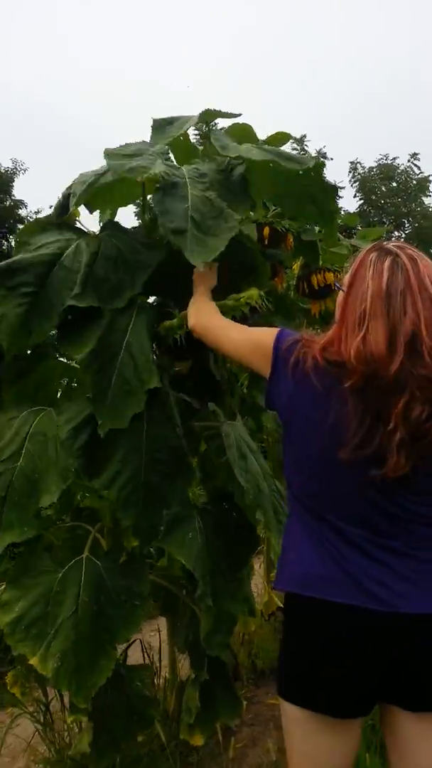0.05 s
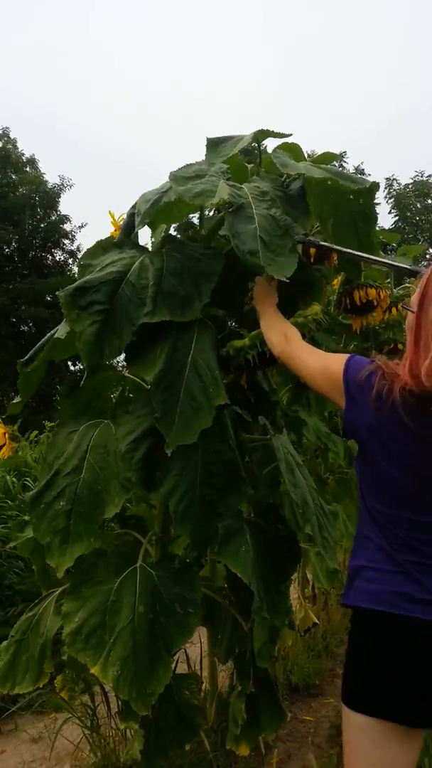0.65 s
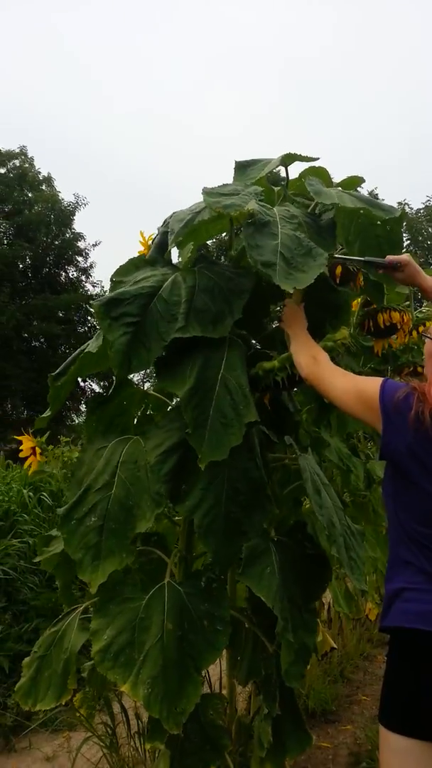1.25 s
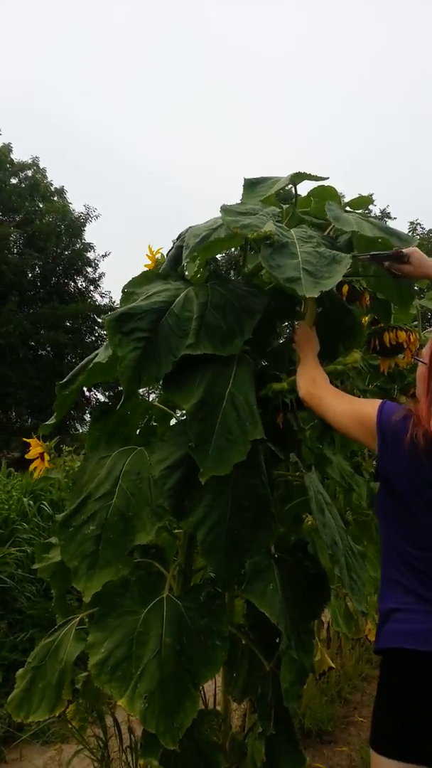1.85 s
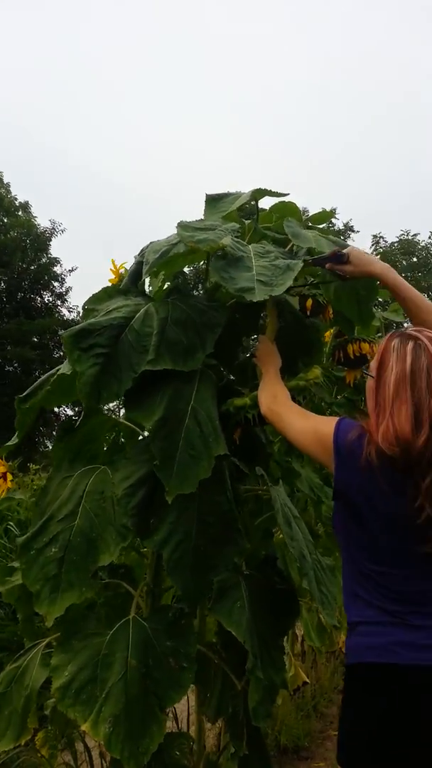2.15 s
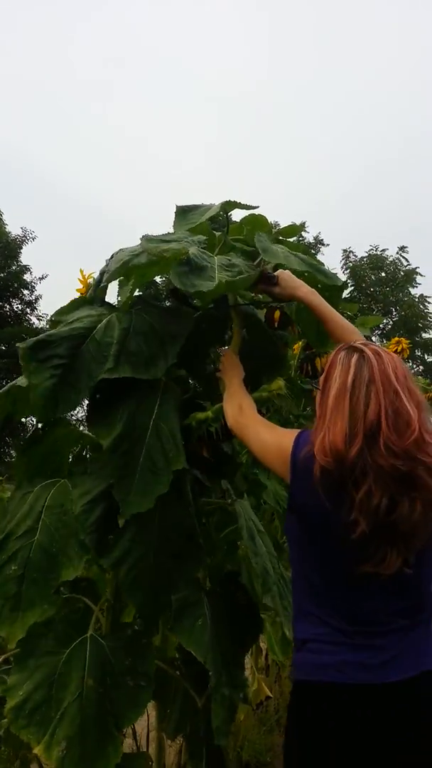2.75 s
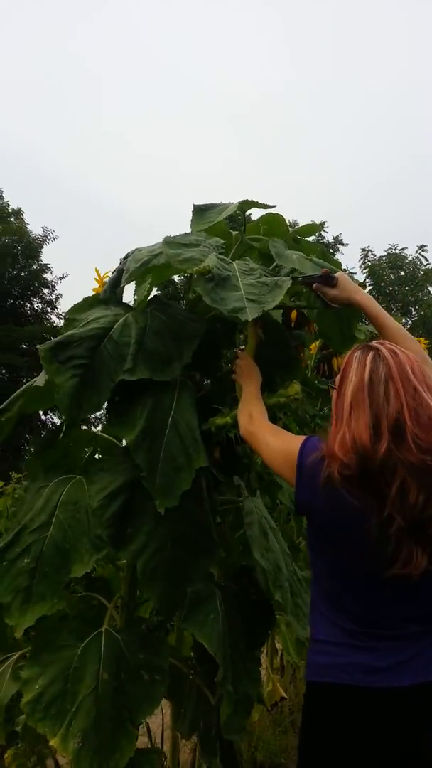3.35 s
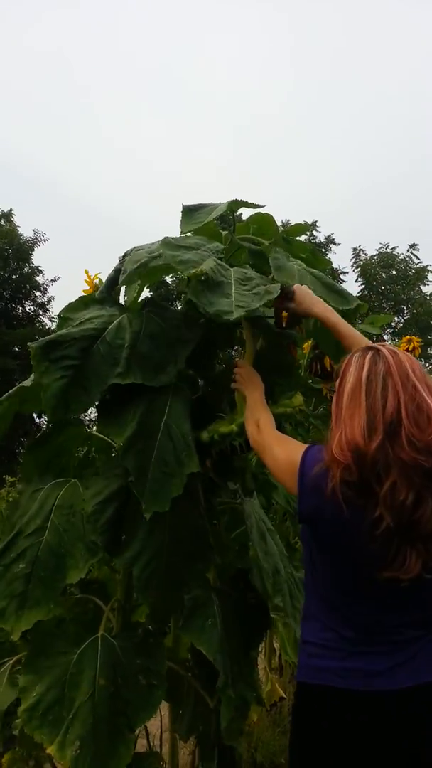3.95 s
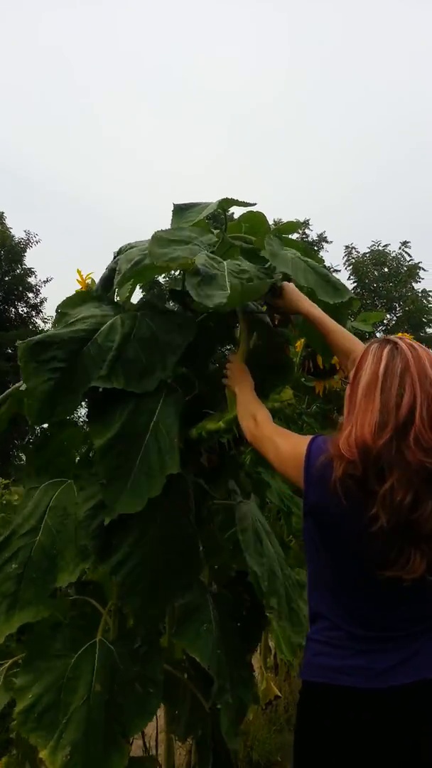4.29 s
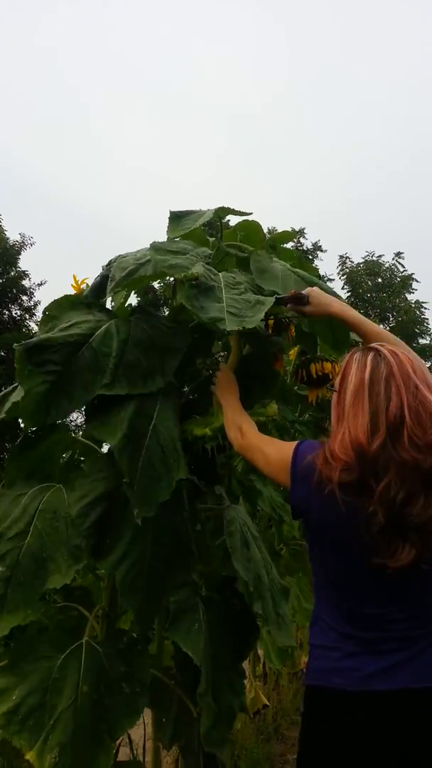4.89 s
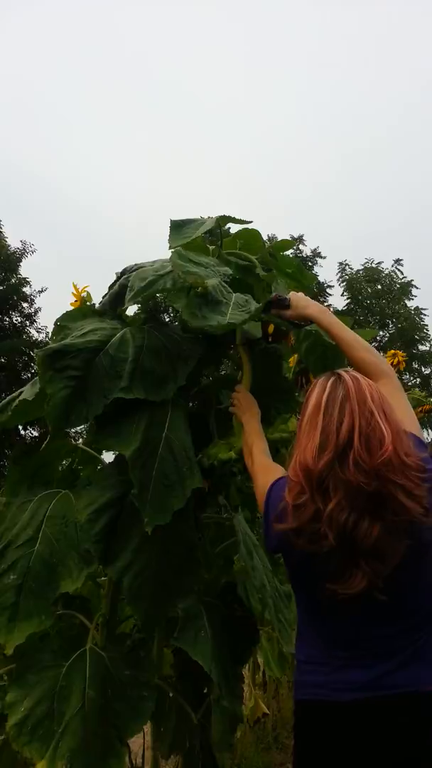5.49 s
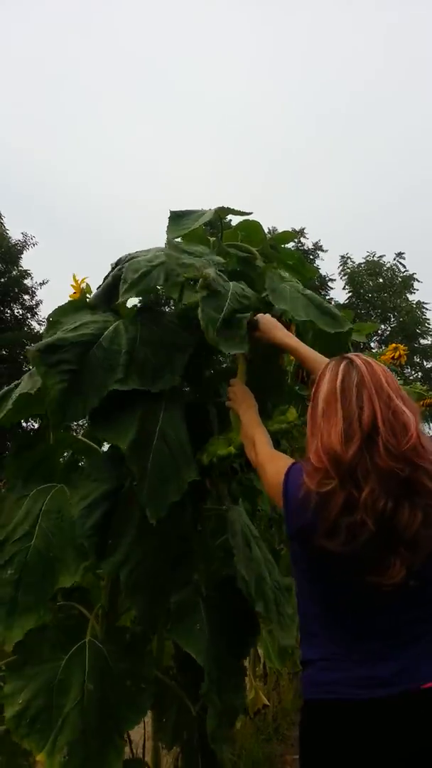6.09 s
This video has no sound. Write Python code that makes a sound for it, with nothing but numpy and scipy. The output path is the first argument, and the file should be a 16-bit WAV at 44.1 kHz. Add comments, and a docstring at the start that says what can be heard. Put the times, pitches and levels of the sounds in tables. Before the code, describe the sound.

Big leaves rustle and a sunflower stalk cracks as its seed head is worked loose, while cicadas pulse and crickets chirp.

```python
"""A summer garden: someone works a seed head off a tall sunflower. Big rough leaves scrape over each
other and flap puffs of air; the stalk's fibres crack and tear, ringing the stalk. Cicadas buckle their
tymbals in the trees, swelling about once a second. Crickets chirp and a katydid rattles with wing
strokes, over far insects and open air. Twice the right microphone pops."""
import sys
import numpy as np
from scipy import signal
from scipy.fft import rfft, irfft, next_fast_len
from scipy.io import wavfile
from scipy.ndimage import uniform_filter1d, map_coordinates

SR = 44100
rng = np.random.default_rng(int(sys.argv[2]) if len(sys.argv) > 2 else 0)


def pcm_store(signal):
    """Save signal as 16-bit PCM."""
    levels = np.round(np.clip(np.atleast_2d(signal), -1, 1) * 32767)
    wavfile.write(sys.argv[1], SR, levels.astype(np.int16).T)


N = 274743

# Leaf-on-leaf strokes: start_s, length_s, relative_db, release_s
LEAF_STROKES = [(0, 0.2, -55.5, 0.21), (0.431, 0.014, -58, 0.027), (0.782, 0.067, -50.5, 0.02),
                (1.064, 0.03, -63.5, 0.054), (1.275, 0.094, -62, .05), (2.301, .02, -54, 0.088),
                (2.504, 0.056, -46, 0.064), (2.677, 0.024, -54.5, .02), (2.773, 0.025, -60, 0.066),
                (2.892, 0.11, -51.5, .14), (2.996, 0.013, -45, 0.012), (3.352, 0.2, -58.5, 0.084),
                (3.656, .03, -58.5, 0.025), (3.785, 0.097, -52, 0.061), (3.988, 0.067, -46.5, 0.053),
                (4.142, 0.036, -44.5, 0.065), (4.318, 0.016, -46.5, .04), (4.391, 0.065, -50, 0.043),
                (4.629, 0.04, -47, 0.11), (4.773, 0.096, -49.5, .14), (5.056, 0.18, -57.5, 0.12),
                (5.239, 0.027, -51.5, 0.017), (5.418, 0.11, -56, .015), (5.618, 0.15, -60, .025),
                (5.945, 0.018, -44.5, 0.036), (6.018, 0.012, -36.5, 0.011), (6.077, 0.015, -44, .11)]
# Rubbing spectrum: freq_hz, gain_db
RUB_SPECTRUM = [(100, -15.5), (250, -8.5), (500, -11), (1200, -6.5), (2000, -4.5), (2700, -2), (3500, -3.5),
                (5000, 2), (6000, 3), (7000, 0), (9000, -7.5), (11500, -12.5), (14500, -21.5)]


def leaf_rubbing(attack_s=0.032):
    """Bristles catch and slip in uneven spurts, leaf edges crinkle, broad surfaces hiss."""
    bristles = sum(foliage(ticks(rate_hz=500, spread_db=2.0), scatter=0.81, t60_s=0.031)
                   for _ in range(5))
    crinkles = foliage(ticks(rate_hz=70, spread_db=2.5), scatter=0.99, t60_s=0.011)
    sliding = rng.standard_normal((2, N))
    rubbing = colour(unit(bristles) + 0.38 * unit(crinkles) + 0.53 * sliding, RUB_SPECTRUM)
    stroke_power = sum((undb(db) * envelope(start_s, length_s, attack_s, release_s)) ** 2
                       for start_s, length_s, db, release_s in LEAF_STROKES)
    contact = undb(-67.5) * dip(depth_db=-8)  # the leaves never quite stop touching
    grip = np.sqrt(stroke_power + contact ** 2)
    return dapple(rubbing, spread_db=4.5, rate_hz=25) * grip * undb(1.35 * walk(rate_hz=70) + 7.0)


# Fibre breaks: start_s, relative_db, brightest_hz, left_minus_right_db
FIBRE_BREAKS = [(0.6802, -44.5, 895, 3), (2.979, -33, 6800, -9), (3.002, -26.5, 6700, 6),
                (4.071, -26.5, 7000, 4), (4.1959, -14.5, 3400, 1.5), (5.231, -22.5, 5300, 6.5),
                (5.4687, -29, 7800, 7.5), (5.5, -22, 6400, 2.5), (5.6112, -37.5, 6000, 5),
                (5.6607, -17.5, 6200, 2), (5.7203, -38, 5000, 5), (5.75, -27.5, 4860, 6),
                (5.883, -25, 6700, -1), (5.99, -31, 7000, 1), (5.997, -15.5, 4430, 2),
                (6.002, -17.5, 2800, -2), (6.0168, -23, 7000, -8), (6.022, -15, 4480, 1.5),
                (6.032, -24, 6700, -11)]
# Fracture spectrum: freq_hz, gain_db
FRACTURE_SPECTRUM = [(100, -37), (300, -13), (700, -5.5), (1400, -15.5), (2500, -7), (3600, 0.5),
                     (4800, 4.5), (5900, -0.5), (7000, 5.5), (9500, -5), (14500, -8.5)]
# Stalk resonances: pitch_hz, t60_s, relative_db
STALK_MODES = [(2516, 0.021, -2.5), (3374, 0.018, -3.5), (4577, 0.045, -4), (5250, 0.038, -1.5),
               (6740, 0.018, 1)]


def stalk_cracks():
    """Each fibre lets go in a run of fractures; the pithy stalk rings and leaves scatter the snap."""
    out = np.zeros((2, N))
    t = np.arange(SR // 10) / SR
    for start_s, db, bright_hz, pan_db in FIBRE_BREAKS:
        fractures = rng.standard_normal((2, len(t))) * np.exp(-t / 0.0013)
        tail = rng.standard_normal((2, len(t))) * decay(t, t60_s=0.035)
        ring = np.zeros(len(t))
        for mode_hz, t60_s, mode_db in STALK_MODES:
            detune = 1 + 0.0167 * rng.standard_normal()  # each break strikes another spot
            ring += undb(mode_db) * decay(t, t60_s) * np.sin(2 * np.pi * mode_hz * detune * t)
        burst = colour(unit(fractures) + 1.1 * unit(tail), FRACTURE_SPECTRUM)
        brightness = [(bright_hz / 3, -7), (bright_hz, 0), (bright_hz * 2, -3), (bright_hz * 6, -14)]
        snap = colour(unit(burst) + 0.5 * unit(ring), brightness)
        peak_rms = np.sqrt(uniform_filter1d(np.mean(snap ** 2, axis=0), SR // 500).max())
        add(out, start_s, snap / peak_rms * undb([[db + pan_db / 2], [db - pan_db / 2]]))
    return out * undb(-4.5)


# Leaf swings: peak_s, relative_db, half_length_s, crumple_offset_db
LEAF_SWINGS = [(2.316, -57, 0.021, -23), (2.473, -50, 0.048, -4.5), (2.57, -47, 0.055, -9),
               (3.51, -58.5, 0.023, -24), (3.789, -50, 0.039, -3), (4.028, -49.5, 0.081, -3.5),
               (4.164, -51, 0.053, -2.5), (4.203, -40, 0.015, -6.5), (4.316, -57, 0.025, 7),
               (4.788, -52, 0.055, -4), (5.955, -55.5, 0.08, -6.5), (6, -44, 0.017, 1.5),
               (6.027, -38, 0.019, 2), (6.079, -47, 0.048, 0), (6.153, -51, 0.075, -10)]
# Air puff spectrum: freq_hz, gain_db
PUFF_SPECTRUM = [(60, -35.5), (140, -4), (220, -0.5), (300, -2), (420, -25.5), (900, -19), (4000, -52)]
# Bending blade spectrum: freq_hz, gain_db
CRUMPLE_SPECTRUM = [(150, -14), (350, -12.5), (480, 2), (620, -5), (850, -2.5), (1300, -13), (4000, -19.5)]


def leaf_flaps():
    """A broad leaf swings and pushes a soft puff of air; its blade crumples as it bends."""
    force = np.zeros((2, N))
    for peak_s, db, half_length_s, crumple_db in LEAF_SWINGS:
        swing = np.hanning(int(2 * half_length_s * SR))
        add(force, peak_s - half_length_s, undb([[db], [db + crumple_db]]) * swing)
    push, bend = force
    puff = colour(foliage(rng.standard_normal(N), scatter=0.31, t60_s=0.041), PUFF_SPECTRUM)
    creases = foliage(ticks(rate_hz=1100, spread_db=3.5), scatter=0.41, t60_s=0.0076)
    crumple = colour(creases, CRUMPLE_SPECTRUM)
    return unit(puff) * push * undb(1.0) + unit(crumple) * bend * undb(3.5)


def leaf_thud(start_s=0.979, contact_s=0.0023, peak_db=-41.5):
    """A leaf blade pulls taut: one soft push rings it for a few cycles."""
    push = np.zeros((1, N))
    add(push, start_s, np.hanning(int(contact_s * SR))[None])
    blade = colour(push, [(60, -27), (150, -8), (235, 3.5), (320, -4.0), (450, -30), (1500, -39)])
    return blade / np.abs(blade).max() * undb(peak_db)


# Chorus swells: peak_s, relative_db, rise_s, fall_s
CICADA_SWELLS = [(.1, -42.5, .3, 0.19), (1.29, -42.5, 0.34, 0.19), (1.66, -54, 0.11, .06),
                 (2.59, -41, 0.37, 0.12), (3.15, -52.5, 0.22, 0.19), (3.71, -42.5, 0.31, 0.22),
                 (4.93, -42.5, 0.39, 0.29), (6.12, -41.5, .24, .3)]
# Cicada body spectrum: freq_hz, gain_db
TYMBAL_SPECTRUM = [(2500, -33.5), (3400, -25.5), (4100, -9), (4800, -8), (5400, -4.5), (6400, 1.5),
                   (7200, -4), (8200, -10.5), (9500, -23.5), (11000, -31), (14500, -35)]


def cicadas():
    """Many tymbals buckle out of step and ring their bodies; the sizzle swells over a quiet lull."""
    t = np.arange(N) / SR
    clicks = np.array([ticks(rate_hz=5000, spread_db=2.0) for _ in range(2)])
    sizzle = dapple(colour(clicks, TYMBAL_SPECTRUM), spread_db=3.0, rate_hz=16)
    power = undb(-65.5) ** 2  # lull
    for peak_s, db, rise_s, fall_s in CICADA_SWELLS:
        width_s = np.where(t < peak_s, rise_s, fall_s)
        swell = undb(db) * np.exp(-((t - peak_s) / width_s) ** 2)
        power += swell ** 2
    return sizzle * np.sqrt(power) * dip(depth_db=-9.5) * undb(1.23 * walk(rate_hz=40) + 1.0)


def chirp(pitch_hz, stroke_s, fall, arch, strokes=7):
    """A few wing strokes; the pitch falls in each as the scraper slows, and arches over the chirp."""
    stroke = np.arange(int(strokes * stroke_s * SR)) / (stroke_s * SR)
    within = stroke % 1
    swell = np.sin(np.pi * stroke / strokes)
    teeth = 0.071 * rng.standard_normal(len(stroke))
    detune = 0.005 * rng.standard_normal()
    hz = pitch_hz * (1 - fall * (within - 0.5) + arch * (swell - 1) + teeth + detune)
    tone = np.sin(2 * np.pi * np.cumsum(hz) / SR)
    return unit(tone * np.sin(np.pi * within) ** 2 * np.sqrt(swell))[None]


# Near cricket's chirp runs: start_s, end_s, period_s
CHIRP_RUNS = [(.335, .6, .196), (.755, 1.4, .188), (1.49, 3.8, .183), (3.945, 6.1, .25)]


def crickets(near_db=-54.5, far_db=-62.0, lead_s=0.028):
    """A near ground cricket scrapes its wings; a fainter, higher one keeps its own pace."""
    near, far = np.zeros((2, 1, N))
    for start_s, end_s, period_s in CHIRP_RUNS:
        for beat_s in np.arange(start_s, end_s, period_s):
            call = chirp(pitch_hz=9350, stroke_s=0.0085, fall=0.13, arch=0.0466)
            add(near, beat_s - lead_s, undb(near_db) * call)
    for beat_s in np.arange(0, N / SR, 0.199):
        jitter_s = 0.013 * rng.standard_normal()
        call = chirp(pitch_hz=9880, stroke_s=0.0089, fall=0.018, arch=0.014)
        add(far, beat_s + jitter_s, undb(far_db) * call)
    return foliage(near[0], scatter=0.69, t60_s=0.034) + foliage(far[0], scatter=2.9, t60_s=0.036)


# Wing rattle: time_s, stroke_rate_hz, relative_db
KATYDID_RATTLE = [(0, 35.7, -52.5), (.6, 42, -57), (1.2, 33, -54), (1.25, 38, -61), (1.7, 33.3, -75),
                  (2.2, 31, -63), (6.23, 23, -80)]


def katydid():
    """Every wing stroke rasps a puff of very high noise."""
    t = np.arange(N) / SR
    time_s, stroke_rate_hz, db = np.transpose(KATYDID_RATTLE)
    phase = np.cumsum(np.interp(t, time_s, stroke_rate_hz)) / SR
    strokes = unit(np.sin(np.pi * phase) ** 4 + 0.72)
    wing_spectrum = [(9000, -34), (11000, -10), (11900, 1), (12400, -8), (13000, 8), (14500, -3.5)]
    rasp = colour(rng.standard_normal((2, N)), wing_spectrum)
    return dapple(rasp, spread_db=2.0, rate_hz=30) * strokes * undb(np.interp(t, time_s, db) - 0.5)


# Right microphone steps: start_s, step_db
MIC_STEPS = [(3.3729, -13), (3.7404, 1.5)]


def microphone_pops(bass_cut_hz=56, damping=1.66):
    """A sudden step in the right microphone's signal; two bass cuts make it swing back and settle."""
    step = np.zeros(N)
    for start_s, step_db in MIC_STEPS:
        step[int(start_s * SR):] += undb(step_db)
    omega = 2 * np.pi * bass_cut_hz
    b, a = signal.bilinear([1, 0, 0], [1, damping * omega, omega ** 2], SR)
    right = signal.lfilter(b, a, signal.lfilter(b, a, step))
    return np.array([np.zeros(N), right])


# Far insect and air spectrum: freq_hz, gain_db
GARDEN_SPECTRUM = [(30, -19), (60, -4), (130, -8), (230, -7), (400, -16), (700, -22.5), (1500, -26.5),
                   (3200, -18.5), (4800, -15), (6000, -23), (7400, -8), (9500, -7), (11200, -15.5),
                   (14500, -9.5)]


def garden(level_db=-54.0):
    """Countless far insects over a faint rumble of open air."""
    noise = rng.standard_normal((2, N)) + 0.5 * rng.standard_normal(N)
    chorus = dapple(colour(noise, GARDEN_SPECTRUM), spread_db=4.5, rate_hz=28)
    return chorus * dip(depth_db=-5) * undb(level_db + walk(rate_hz=16))


def foliage(x, scatter, t60_s, left_lag_samples=3):
    """Direct sound reaches the right microphone first; leaves scatter a short tail to each side."""
    t = np.arange(SR // 20) / SR
    response = rng.standard_normal((2, len(t))) * decay(t, t60_s)
    response *= scatter / np.sqrt(np.sum(response ** 2, axis=1, keepdims=True))
    response[0, left_lag_samples] += 1
    response[1, 0] += 1
    return signal.oaconvolve(x[None], response, axes=1)[:, :len(x)] / np.sqrt(1 + scatter ** 2)


def dapple(x, spread_db, rate_hz, size=1024):
    """Moving leaves reflect and shade the sound, so narrow bands swell and fade; output rms 1."""
    hz, t, bands = signal.stft(x, SR, nperseg=size)
    field = rng.standard_normal((2, 512, 512))
    grid = np.meshgrid(8 * np.sqrt(hz / 30), t * rate_hz, indexing="ij")
    db = spread_db * np.array([map_coordinates(side, grid, order=1) for side in field])
    return unit(signal.istft(bands * undb(db), SR, nperseg=size)[1][:, :N])


def dip(depth_db):
    """Gain of a background layer whose level dips briefly."""
    return undb(depth_db * envelope(start_s=1.74, hold_s=0.22, attack_s=0.012, release_s=0.2))


def envelope(start_s, hold_s, attack_s, release_s):
    """Grows to 1 at start_s, holds, then dies away."""
    t = np.arange(N) / SR - start_s
    return np.exp(np.minimum(t, 0) / attack_s - np.maximum(t - hold_s, 0) / release_s)


def decay(t, t60_s):
    """Falls 60 dB in t60_s."""
    return np.exp(-np.log(1000) * t / t60_s)


def ticks(rate_hz, spread_db):
    """Random tiny clicks, a few much larger than the rest."""
    size = undb(spread_db * np.minimum(rng.exponential(size=N), 4))
    return unit((rng.random(N) < rate_hz / SR) * size * rng.choice([-1, 1], N))


def walk(rate_hz):
    """Random drift, spread near 1."""
    steps = rng.standard_normal(4096)
    return np.interp(np.arange(N) / SR * rate_hz, np.arange(len(steps)), steps)


def colour(x, spectrum, size=2048):
    """Minimum-phase filter through (freq_hz, gain_db) points; white noise keeps its power."""
    cepstrum = irfft(np.log(unit(undb(bin_db(spectrum, size)))))
    cepstrum[1:size // 2] *= 2
    cepstrum[size // 2 + 1:] = 0
    response = irfft(np.exp(rfft(cepstrum)))
    return signal.oaconvolve(x, response[None], axes=1)[:, :x.shape[1]]


def bin_db(spectrum, size):
    """Decibels at each FFT bin, interpolated over log frequency."""
    hz, db = np.transpose(spectrum)
    return np.interp(np.log(np.fft.rfftfreq(size, 1 / SR) + 1), np.log(hz), db)


def add(out, start_s, sound):
    """Mix a short sound in at start_s."""
    i = max(int(start_s * SR), 0)
    part = out[:, i:i + sound.shape[1]]
    part += sound[:, :part.shape[1]]


def undb(db):
    """Decibels to gain."""
    return 10 ** (np.asarray(db) / 20)


def unit(x):
    """Scale to rms 1."""
    return x / np.sqrt(np.mean(x ** 2) + 1e-18)


# Colour difference between the microphones: freq_hz, left_minus_right_db
MIC_BALANCE = [(100, -0.5), (300, 2.5), (1000, 3), (2500, 4.5), (4000, 3), (5000, 8.5), (5800, 0.5),
               (6400, -9), (7100, -14), (8200, -8), (9500, -6.5), (11000, -3.5), (14500, -6.5)]


def scene():
    """Plant and insects, each microphone hearing them in its own colour."""
    plant = leaf_rubbing() + leaf_flaps() + leaf_thud() + stalk_cracks()
    sound = plant + cicadas() + crickets() + katydid() + garden()
    size = next_fast_len(N)
    balance_db = bin_db(MIC_BALANCE, size)
    mic_gain = undb([balance_db / 2, -balance_db / 2])
    return irfft(rfft(sound, size) * mic_gain, size)[:, :N] + microphone_pops()


def record(dry, ceiling=0.88, top_hz=14600):
    """The phone rounds the highest peak and cuts the top steeply."""
    lowpass = signal.ellip(10, 0.2, 70, top_hz, fs=SR, output="sos")
    return signal.sosfilt(lowpass, ceiling * np.tanh(dry / ceiling))


dry = scene()
out = record(dry)
pcm_store(out)
```